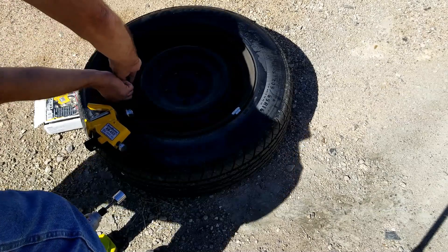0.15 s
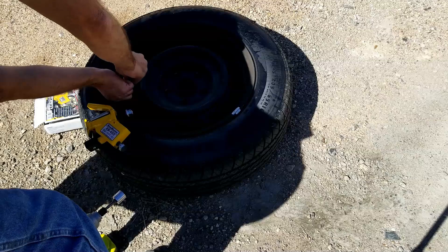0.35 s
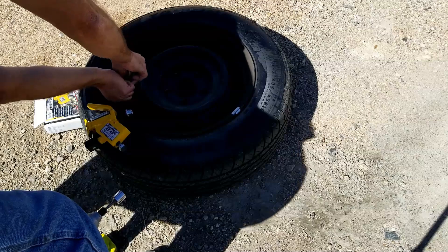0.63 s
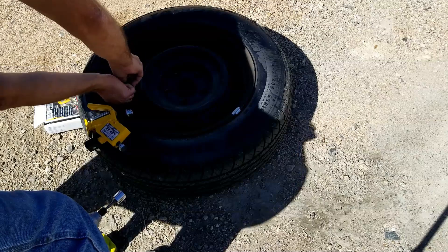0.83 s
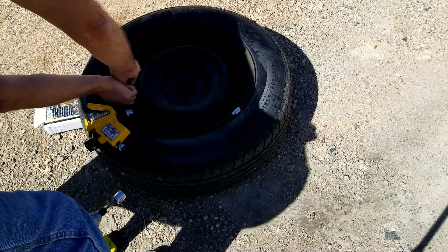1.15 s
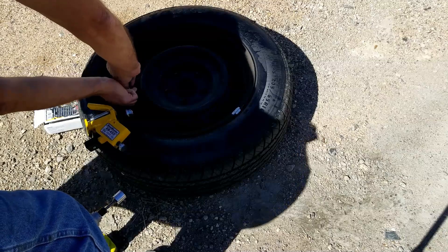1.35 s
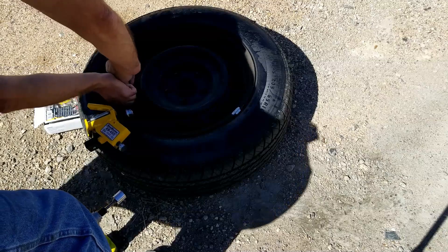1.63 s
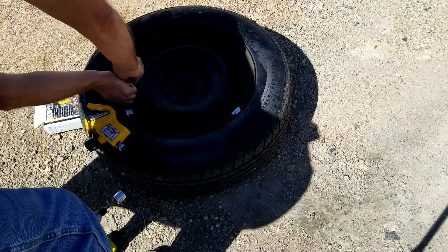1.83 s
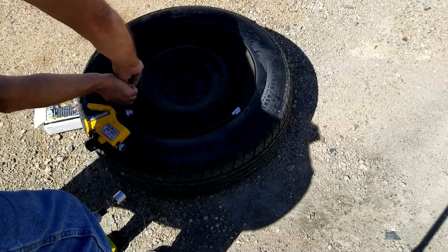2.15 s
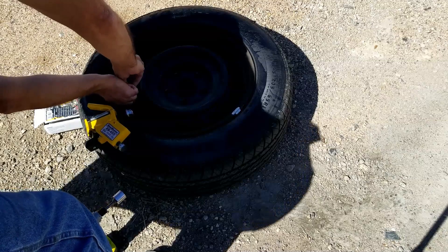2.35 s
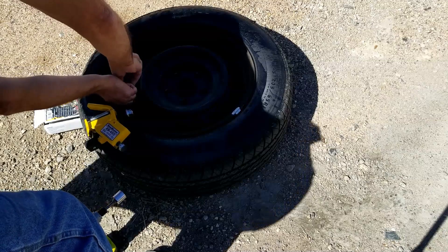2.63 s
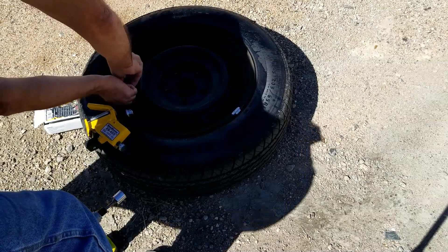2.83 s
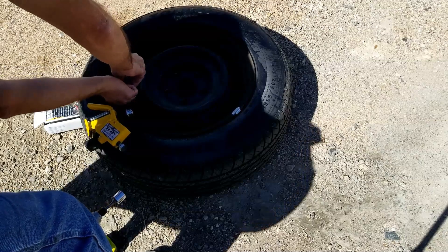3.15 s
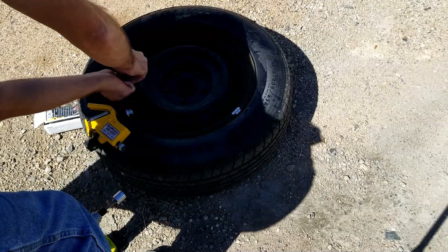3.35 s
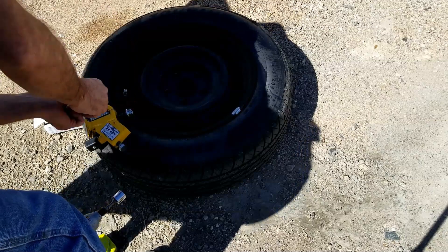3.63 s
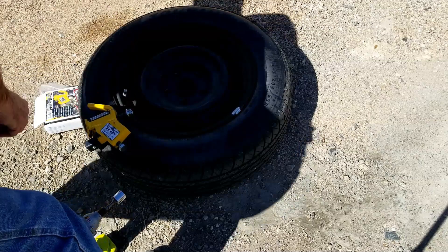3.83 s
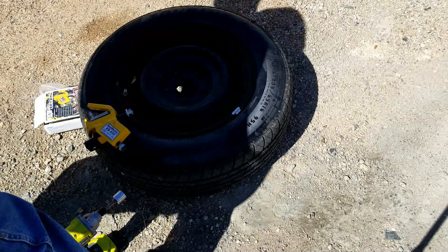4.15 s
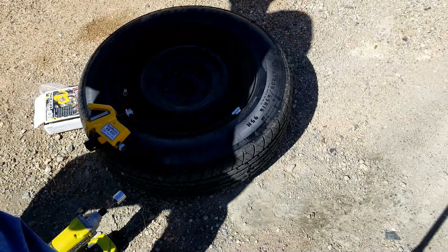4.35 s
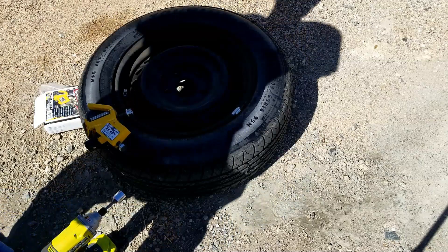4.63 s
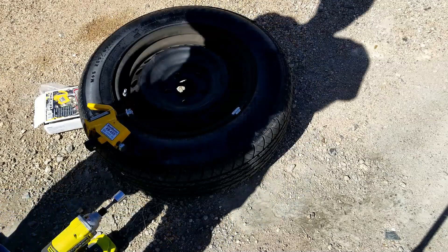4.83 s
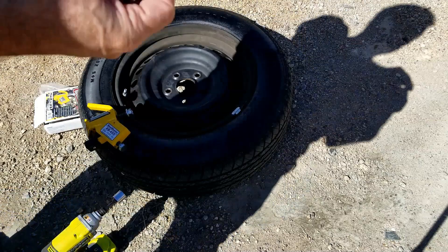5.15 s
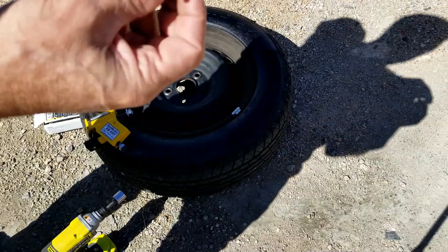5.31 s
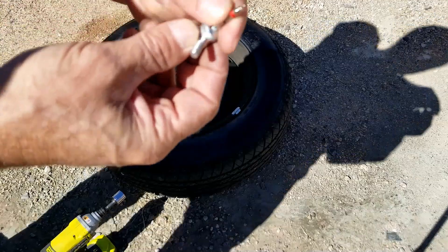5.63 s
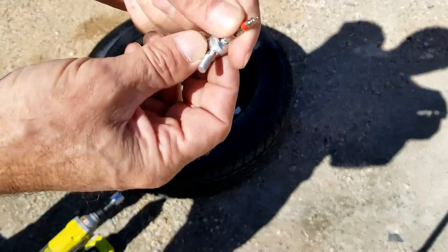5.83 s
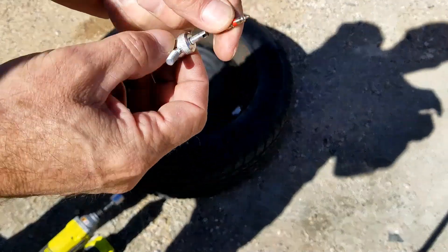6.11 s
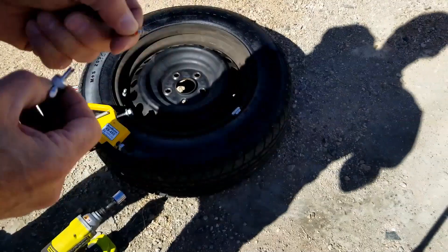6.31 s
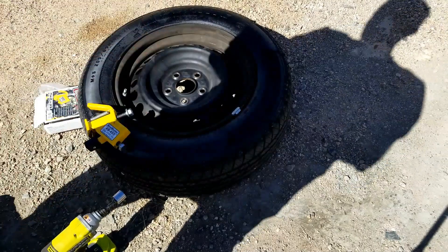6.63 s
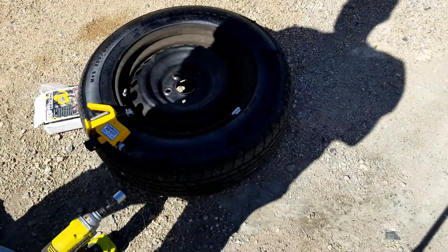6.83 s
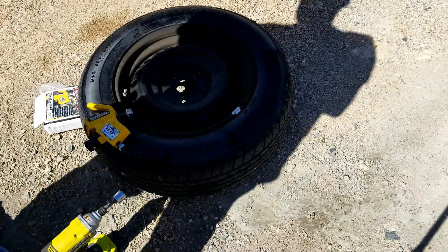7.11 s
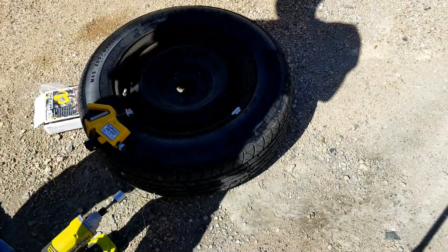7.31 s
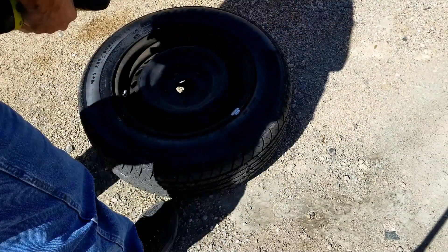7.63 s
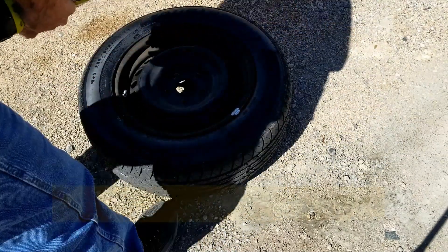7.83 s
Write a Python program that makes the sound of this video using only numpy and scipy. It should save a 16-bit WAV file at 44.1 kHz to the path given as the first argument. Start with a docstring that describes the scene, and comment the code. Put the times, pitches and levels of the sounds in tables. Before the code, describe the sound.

Pressurised air sprays unevenly from a tyre valve, squeaks, thins to a steady hiss, ends in a breathy whistle and gravel crunches, over gusty wind rumble.

```python
"""Outdoors on gravel, fingers unscrew the core of a car tyre's valve: air sprays past it, sizzling and sputtering.
The loose core squeals, spits and chirps as it comes out, then air streams from the bare stem and a hand passes.
Near the end the stem whistles, the jet is shut off and a faint leak stays. Air sounds are coloured noise; tones are sines.
A low rumble with gusts of wind runs throughout; from the middle on come dull knocks and shoes on the gravel,
made from tiny clicks."""
import sys
import numpy as np
from scipy import signal
from scipy.fft import rfft, irfft
from scipy.io import wavfile
from scipy.ndimage import uniform_filter1d

SR = 44100
rng = np.random.default_rng(int(sys.argv[2]) if len(sys.argv) > 2 else 0)


def file_out(sig):
    """Save sig as 16-bit WAV at sys.argv[1]."""
    # one column per channel
    cols = np.atleast_2d(sig).T
    # limit, then scale
    lim = np.clip(cols, -1, 1)
    pcm = np.round(lim * 32767).astype(np.int16)
    wavfile.write(sys.argv[1], SR, pcm)


N = 351477
FRAME = 512  # samples in one frame of the noise shaping
TIME = np.arange(N) / SR
BIN_HZ, FRAME_S, _ = signal.stft(np.zeros(N), SR, nperseg=FRAME)

CORE_OUT_S, CORE_FADE_S = 3.37, 0.16  # the core leaves; the two jets cross-fade this long
SHUT_S, SHUT_TAIL_S = 7.502, 0.017  # the stem is shut; the hiss falls to 37 % in this time
CHOKE_FADE_S = 0.036

# a hand near the microphone favours one treble band, shades another and reflects the rest:
# [t/s, favoured f/Hz, emphasis/dB, shade/dB, palm echo share 0-1]
HAND = [(5.12, 12100, -2, 4, 0.4), (5.27, 12000, 11, 3, 0.35), (5.45, 12100, 18, 3, 0.5),
        (5.64, 12100, 12, 11, 0.5), (5.72, 13400, 14, 14, 0.45), (6.08, 13800, 16, 18, 0.3),
        (6.25, 14000, 0, 11, 0)]
# a fingertip chokes the air: [start t/s, end t/s, level change/dB]
CHOKES = [(1.0, 1.108, -13.5), (1.199, 1.257, -13)]


def throttled_jet():
    """Air sprays past the core, rings the stem and the cupped hands, and sputters as the core turns."""
    # air let past the core: loosened, choked and reopened, then at its widest: [t/s, level/dB]
    flow_table = [
        [(0.0, -27), (0.1, -30), (0.135, -26.5), (0.224, -29), (0.262, -30), (0.285, -26), (0.45, -28),
         (0.55, -27), (0.67, -27.5), (0.745, -29), (0.766, -33), (0.79, -27.5), (0.93, -30.5), (0.95, -34)],
        [(1.1, -34), (1.125, -31.5), (1.165, -35.5), (1.32, -35.5), (1.355, -27.5), (1.5, -30.5), (1.55, -28.5),
         (1.61, -29.5), (1.645, -27), (1.68, -31), (1.77, -25)],
        [(1.855, -22), (1.88, -29), (1.91, -22.5), (1.99, -22), (2.38, -18), (2.52, -22), (2.88, -23),
         (2.99, -22), (3.11, -27), (3.15, -24), (3.5, -26.5)],
    ]
    # colour of the broad spray: [f/Hz, level per Hz/dB]
    spray_colour = [(300, -13), (900, -9.5), (1400, -1.5), (2600, -2.5), (3800, -6), (4500, -4),
                    (5600, -2.5), (9000, -1.5), (9800, 2), (10700, 1.5), (11800, 4), (13000, -2.5),
                    (16000, -7)]
    # colour of the sizzle from the slit round the core: [f/Hz, level per Hz/dB]
    sizzle_colour = [(10800, -40), (11900, -13), (12700, -7), (13500, -2), (14300, -1), (15100, -1),
                     (15700, 1)]
    # spells in which that slit sizzles: [start t/s, end t/s, level/dB]
    sizzle_spells = [(0.018, 0.726, -15), (0.265, 0.33, -13), (0.36, 0.443, -14), (0.476, 0.59, -14),
                     (1.55, 1.68, -24), (1.735, 1.88, -11), (2.293, 2.676, -9.5), (2.66, 2.912, -12)]
    spray_db, hollow_db, stem_db, sizzle_db = 1, -11, -3.5, 5  # relative to the flow
    cupped_db = 2  # the hands close round the valve and their hollow rings louder
    ringing_choked = 0.8  # share of a choke, in dB, that reaches the two resonances

    chokes_db = sum(db * gate(start, end, CHOKE_FADE_S) for start, end, db in CHOKES)
    flow_db = curves(np.vstack(flow_table))[0]
    flow = undb(flow_db + chokes_db)
    ringing = undb(flow_db + ringing_choked * chokes_db)

    fingers = reflections([0.62, 1.13], share=0.11, drift=0.097)
    spray = undb(spray_db) * turbulence(colour(spray_colour) * fingers)

    cupped = gate(1.92, 2.6, 0.06)
    hollow_hz = 1800 * (1 + wander(0.012, rate=6.86))
    hollow = turbulence(resonance(hollow_hz, 220), patchy_db=0.7)
    hollow = hollow * undb(hollow_db + cupped_db * cupped)

    stem_modes = resonance(8150, 1100) + 0.45 * resonance(6770, 1100)
    stem = undb(stem_db + 0.5 * walk(16)) * turbulence(stem_modes * fingers)

    spells = sum(undb(db) * gate(start, end, 0.056) ** 2 for start, end, db in sizzle_spells)
    sizzle_level = np.hypot(undb(sizzle_db) * flow, spells)
    sizzle = sizzle_level * turbulence(colour(sizzle_colour) * fingers)

    sputter = undb(0.6 * walk(40) + 0.5 * walk(200))
    before_core_leaves = np.sqrt(gate(-1, CORE_OUT_S, CORE_FADE_S))
    return (flow * spray + ringing * (hollow + stem) + sizzle) * sputter * before_core_leaves


def open_jet():
    """A steadier stream from the bare stem: one strong pipe resonance, and the wheel dish answering below."""
    # air from the open stem: [t/s, jet level/dB, stem resonance level/dB]
    stream_table = [(3.5, -40.5, -31), (3.86, -40, -29), (4.03, -45, -28), (4.28, -43.5, -29.5),
                    (4.42, -48, -33.5), (4.44, -44, -29.5), (5.12, -46, -33), (5.17, -48.5, -36.5),
                    (5.24, -44, -34.5), (5.64, -44, -35.5), (5.77, -44.5, -42), (6.15, -44.5, -44),
                    (6.25, -44, -35), (6.4, -43, -26.5), (6.91, -43.5, -26), (7.4, -41, -26),
                    (7.48, -42, -29)]
    # colours of the spray, the wheel dish and the sizzle: [f/Hz, level per Hz/dB]
    spray_colour = [(500, -13), (1100, -15.5), (3000, -6), (4000, -9), (4900, -2.5), (5600, -3.5),
                    (6700, -0.5), (9500, 5), (11000, 2), (12000, -1), (16000, -5)]
    dish_colour = [(600, -5.5), (1100, -11), (1500, 2.5), (1850, 2.5), (2250, 0), (2700, 3.5), (3200, -9.5),
                   (3900, -12), (5000, -12)]
    sizzle_colour = [(10500, -48), (11400, 0), (12000, 3.5), (12800, 3.5), (13900, 5.5), (15200, 7.5),
                     (15700, 8)]
    spray_db, dish_db, sizzle_db = 12.5, 4, 21.5  # relative to the jet level
    # until they move off, the fingers break up the jet: more spray, less sizzle
    fingers_spray_db, fingers_sizzle_db = 2, -1
    hand_sizzle_db = -2.5  # the passing hand screens the sizzle
    pipe_width_hz, shoulder_db = 560, -9.5  # a weaker resonance sits just above the stem's own

    jet_db, stem_db = curves(stream_table)
    stem_hz = 7844 * (1 + wander(0.0027, rate=6.7))
    fingers = gate(-1, 3.92, 0.055)
    hand_hz, emphasis_db, shade_db, palm_share = hand_at(FRAME_S)
    # the uneven palm mirrors mainly a middle band of the hiss
    palm = echo(0.46, palm_share * resonance(5550, 1300))
    shadow = palm * undb(-shade_db * resonance(8950, 3300))

    spray = turbulence(colour(spray_colour) * shadow)
    spray = spray * undb(spray_db + fingers_spray_db * fingers)
    dish = undb(dish_db) * turbulence(colour(dish_colour))
    pipe = resonance(stem_hz, pipe_width_hz) + undb(shoulder_db) * resonance(8460, pipe_width_hz)
    stem = undb(stem_db) * turbulence(pipe * palm, patchy_db=1.5)

    favoured = undb(emphasis_db * resonance(hand_hz, 1500))
    sizzle = turbulence(colour(sizzle_colour) * shadow * favoured, patchy_db=2.5)
    sizzle = sizzle * undb(sizzle_db + fingers_sizzle_db * fingers + hand_sizzle_db * hand_near())

    flutter = undb(0.22 * walk(16) + 0.44 * walk(200))
    after_core_leaves = np.sqrt(gate(CORE_OUT_S, np.inf, CORE_FADE_S))
    return (undb(jet_db) * (spray + dish + sizzle) + stem) * flutter * after_core_leaves


def spits():
    """The jet tears past the loose core in rough bursts that swell and then break off."""
    # [start t/s, end t/s, start f/Hz, end f/Hz, width/Hz, final level/dB]
    bursts = [(2.715, 2.738, 1780, 1740, 220, -32), (2.948, 2.998, 2400, 3300, 2400, -26.5),
              (3.2, 3.37, 1900, 1300, 1000, -31), (3.27, 3.41, 1050, 800, 550, -38)]
    rise_db = 3.5
    out = 0
    for start, end, *band, db in bursts:
        swell_db = np.interp(TIME, [start, end], [db - rise_db, db])
        out = out + undb(swell_db) * gate(start, end, 0.03) * airy_glide(start, end, *band)
    return out * undb(2 * walk(260))  # fast, rough changes of level


def edge_tones():
    """The jet grazes a fingertip or the stem's lip and narrows into an airy pitch."""
    # [start t/s, end t/s, start f/Hz, end f/Hz, width/Hz, level/dB]
    tone_table = [(0.119, 0.383, 7250, 7130, 1740, -24), (0.371, 0.688, 6400, 6510, 350, -28.5),
                  (0.358, 0.688, 5530, 5600, 350, -33), (0.683, 0.758, 7860, 8250, 2600, -25),
                  (1.473, 1.745, 5420, 5440, 250, -36.5), (1.677, 1.736, 7400, 7100, 1500, -25),
                  (1.743, 1.872, 8100, 8100, 500, -28), (1.95, 2.391, 6480, 6660, 800, -26.5),
                  (2.0, 2.74, 4300, 4360, 220, -38), (2.95, 3.002, 8000, 8400, 900, -19.5),
                  (2.955, 3.0, 5000, 5400, 1500, -29), (2.945, 3.0, 11500, 12600, 2600, -21.5),
                  (3.122, 3.434, 12800, 8600, 1400, -31), (3.25, 3.498, 8000, 7860, 550, -38),
                  (5.658, 6.203, 7180, 7270, 400, -41.5), (6.404, 7.103, 5900, 5800, 400, -41),
                  (7.099, 7.51, 8460, 8600, 600, -30)]
    out = 0
    for start, end, *band, db in tone_table:
        fade = gate(start, end, (end - start) / 4)
        out = out + undb(db) * fade * airy_glide(start, end, *band)
    return out


def squeal():
    """The loose core squeals: a shaky sine tone and its octave."""
    # [t/s, pitch f/Hz, level/dB]
    pitch_table = [(2.725, 1640, -34), (2.75, 1595, -25), (2.818, 1492, -20), (2.845, 1510, -22.5),
                   (2.858, 1670, -21), (2.872, 1730, -21), (2.905, 1490, -32)]
    return whistle(pitch_table, jitter=0.009, waver=0.004, flutter_db=1.2, octave_db=-21, octave_rise_db=5)


def chirp():
    """The core chirps upward as it comes out, and the octave takes over."""
    # [t/s, pitch f/Hz, level/dB]
    pitch_table = [(2.996, 5330, -28), (3.024, 5600, -18.5), (3.048, 6080, -27), (3.066, 6490, -27),
                   (3.083, 6900, -27)]
    return whistle(pitch_table, jitter=0.014, waver=0.002, flutter_db=2.2, octave_db=-7, octave_rise_db=19)


def stem_whistle():
    """The bare stem's whistle is breathy and throbs as it catches, then settles and gains its octave."""
    # [t/s, pitch f/Hz, level/dB]
    pitch_table = [(7.04, 5850, -39), (7.125, 5850, -25.5), (7.19, 5858, -24), (7.24, 5865, -21),
                   (7.405, 5895, -16.5), (7.455, 5900, -18), (7.486, 5920, -14), (7.506, 5930, -15)]
    throb_db, throb_hz, settle_s = 4.5, 40, 0.3
    (start, start_hz, _), (end, end_hz, _) = pitch_table[0], pitch_table[-1]
    unsettled = np.exp(-np.maximum(TIME - start, 0) / settle_s)
    throb = np.sin(2 * np.pi * np.cumsum(throb_hz * (1 + 0.3 * walk(20))) / SR)
    tone = whistle(pitch_table, jitter=0.0035, waver=0.001, flutter_db=0.8, octave_db=-21, octave_rise_db=6)
    airy = airy_glide(start, end, start_hz, end_hz, width_hz=220)
    airy = airy * undb(curves(pitch_table)[1]) * gate(start, end, 0.004)
    airy_share = 0.7 * unsettled ** 3  # share of the power
    mix = np.sqrt(1 - airy_share) * tone + np.sqrt(airy_share) * airy
    return undb(throb_db * unsettled * throb + 0.8 * walk(45)) * mix


def whistle(table, jitter, waver, flutter_db, octave_db, octave_rise_db=0):
    """Vortices lock into a tone and a rising octave; turbulence shakes the pitch and level."""
    hz, db = curves(table)
    start, end = table[0][0], table[-1][0]
    shaken_hz = hz * (1 + jitter * walk(900) + waver * walk(60))
    phase = 2 * np.pi * np.cumsum(shaken_hz) / SR
    rise = np.interp(TIME, [start, end], [0, 1]) ** 2
    octave = undb(octave_db + octave_rise_db * rise)
    tone = undb(db) * (np.sin(phase) + octave * np.sin(2 * phase))
    return np.sqrt(2) * tone * undb(flutter_db * walk(150)) * gate(start, end, 0.0003)


def leak(flowing):
    """Once the jet is shut, and more softly while it is choked, a little air still hisses out."""
    # [f/Hz, level per Hz/dB]
    leak_colour = [(900, -15), (2000, 0), (3200, -11), (4500, -17), (6000, -19), (7100, 1), (7800, 3),
                   (8900, -3.5), (10000, -5), (10800, -19), (12000, 1.5), (12750, -11), (14100, -2),
                   (15700, -2)]
    leak_db, choked_db = -33.5, -6.5  # level when shut, and its change when only choked
    choked = sum(gate(start, end, CHOKE_FADE_S) for start, end, _ in CHOKES)
    return undb(leak_db) * turbulence(colour(leak_colour)) * (1 - flowing + undb(choked_db) * choked)


def mirrored(x):
    """The rim, the tyre and the ground send early echoes; the sum is scaled back to about equal power."""
    # [lag/ms, level/dB]
    mirrors = [(2.3, -19), (4.6, -17), (7.7, -15)]
    echoes = sum(undb(db) * np.interp(TIME - lag_ms / 1000, TIME, x, left=0) for lag_ms, db in mirrors)
    return (x + echoes) / np.sqrt(1 + sum(undb(db) ** 2 for _, db in mirrors))


def knocks():
    """Dull knocks: single clicks ringing in a low band."""
    # [t/s, peak level/dB, ring f/Hz]
    knock_table = [(4.617, -31, 700), (4.738, -34, 950), (4.914, -27.5, 950), (4.992, -28, 1400),
                   (5.004, -23.5, 1350), (6.347, -22, 1300), (6.388, -32, 1100), (6.6, -33, 1150),
                   (6.732, -32, 850), (6.762, -30, 750), (7.472, -17.5, 1200)]
    return taps(knock_table, decay_s=0.005, scrape=0.06, spread=0.3)


def grit():
    """Grit cracks under a shoe: brighter clicks with more scrape."""
    # [t/s, peak level/dB, ring f/Hz]
    crack_table = [(7.539, -30, 3700), (7.577, -31, 4600), (7.8035, -17.5, 3000), (7.806, -20, 2700),
                   (7.8085, -26, 2800), (7.840, -28, 2600), (7.850, -24, 4800)]
    return taps(crack_table, decay_s=0.002, scrape=0.4, spread=0.45)


def taps(table, decay_s, scrape, spread):
    """One sharp contact and a brief scrape after it, both in a broad resonance."""
    out, t = np.zeros(N), TIME[:SR // 16]
    for s, db, hz in table:
        edges_hz = [hz / (1 + spread), min(hz * (1 + spread), SR / 3)]
        band = signal.butter(2, edges_hz, "band", fs=SR, output="sos")
        contact = (t == 0) + scrape * rng.standard_normal(len(t)) * np.exp(-t / decay_s)
        tap = signal.sosfilt(band, contact)
        i = int(s * SR)
        out[i:i + len(t)] += (undb(db) * tap / np.abs(tap).max())[:N - i]
    return out


def scuffs():
    """Shoes shift on the gravel: each scuff is a swell of tiny cracks of uneven size."""
    # [start t/s, end t/s, centre f/Hz, level/dB]
    scuff_table = [(4.52, 4.76, 950, -47), (4.85, 4.93, 1000, -47), (6.59, 6.62, 1200, -43),
                   (6.7, 6.8, 900, -45), (7.52, 7.61, 1300, -42), (7.555, 7.615, 4200, -41.5),
                   (7.815, 7.87, 3300, -43.5)]
    cracks_per_s, crack_spread_db, band_spread = 1400, 7, 0.35
    out = 0
    for start, end, hz, db in scuff_table:
        happens = rng.random(N) < cracks_per_s / SR
        size = undb(crack_spread_db * rng.uniform(-0.76, 1, N))
        cracks = happens * rng.choice([-1, 1], N) * size
        edges_hz = [hz / (1 + band_spread), hz * (1 + band_spread)]
        band = signal.butter(2, edges_hz, "band", fs=SR, output="sos")
        crunch = signal.sosfilt(band, cracks)
        out = out + undb(db) * gate(start, end, (end - start) / 2) * crunch / crunch.std()
    return out


def rumble():
    """A low rumble sinks and swells, with strong gusts of wind and a wavering hum in it."""
    # the rumble sinks and swells: [t/s, low rumble level/dB, upper rumble level/dB]
    rumble_table = [(0, -25.5, -36.5), (1.0, -27, -39), (1.65, -29, -39.5), (1.71, -38, -38.5),
                    (2.5, -39, -41.5), (3.3, -33, -41.5), (3.65, -39.5, -44), (4.25, -34.5, -44),
                    (4.38, -51, -48.5), (4.6, -37, -41), (5.15, -43, -43.5), (5.4, -34.5, -40.5),
                    (6.95, -36.5, -39.5), (7.47, -31, -39), (7.52, -31, -31.5), (7.97, -22, -34)]
    # the strongest gusts: [t/s, boom level/dB, body level/dB]
    gust_table = [(0.09, -19, -33), (0.23, -21.5, -32), (0.63, -24, -29), (0.95, -22, -29),
                  (1.621, -22, -34), (1.92, -33, -28), (2.23, -26, -38), (2.77, -36, -29), (3.15, -28, -31),
                  (3.56, -26, -26), (4.22, -37, -28), (4.65, -28, -25.5), (5.06, -27.5, -25.5),
                  (5.44, -32, -27), (5.71, -25.5, -29), (5.9, -31, -32), (6.15, -24, -29.5),
                  (6.46, -22.5, -27.5), (6.73, -28, -25.5), (7.05, -19.5, -27), (7.33, -26, -26.5),
                  (7.58, -18.5, -21), (7.75, -16.5, -26), (7.93, -28, -23)]
    # colours of the rumble, from its lowest part up: [f/Hz, level per Hz/dB]
    boom_colour = [(20, -15), (35, -18), (50, -7.5), (62, -1.5), (76, 2), (92, -26), (130, -56.5)]
    body_colour = [(65, -14.5), (84, 1.5), (99, 1), (113, -6), (127, -2.5), (140, -6), (154, -10.5),
                   (178, -19.5), (193, -10), (215, -15.5), (260, -33), (400, -66)]
    upper_colour = [(170, -2), (235, 0), (285, 1), (325, -2.5), (380, -1.5), (500, -5.5), (670, -12),
                    (900, -18), (1500, -25.5), (4000, -72)]
    gust_s = 0.042  # a gust falls to 37 % this long before and after its peak
    boom_db, body_db, body_follows = 1, -13.5, 0.52  # between gusts the body grows more slowly than the boom
    upper_follows = 0.39  # share of the buffeting that reaches the upper rumble

    low_db, upper_db = curves(rumble_table)
    buffet_db = 1.57 * walk(14)
    low_level = undb(low_db + buffet_db)
    boom_gusts, body_gusts = sum(
        undb(dbs)[:, None] * np.exp(-((TIME - s) / gust_s) ** 2) for s, *dbs in gust_table)

    hum_share = 0.78 * np.exp(-TIME / 2)  # share of the boom's power, fading away
    hum = np.sqrt(2) * np.sin(2 * np.pi * np.cumsum(62.2 * (1 + 0.022 * walk(13))) / SR)
    boom = np.sqrt(hum_share) * hum + np.sqrt(1 - hum_share) * low_noise(boom_colour, evenness=0.95)
    boom = boom * np.hypot(undb(boom_db) * low_level, boom_gusts)

    body = low_noise(body_colour, evenness=0.8)
    body = body * np.hypot(undb(body_db) * low_level ** body_follows, body_gusts)
    upper = low_noise(upper_colour, evenness=1)
    upper = upper * undb(upper_db + upper_follows * buffet_db + 1.3 * walk(40))
    return (boom + body) * undb(1.4 * walk(40)) + upper


def low_noise(points, evenness):
    """Low noise of unit level; evenness 0-1 steadies its slow swells."""
    spectrum = rfft(rng.standard_normal(N)) * colour(points, np.fft.rfftfreq(N, 1 / SR))
    noise = irfft(spectrum, N)
    power = uniform_filter1d(noise ** 2, size=SR // 12)
    noise = noise / power ** (evenness / 2)
    return noise / noise.std()


def turbulence(gain, patchy_db=3.0):
    """Noise of unit level whose colour follows a gain over frequency and time; its bands flicker at random."""
    white = signal.stft(rng.standard_normal(N), nperseg=FRAME)[2]
    flicker = uniform_filter1d(rng.standard_normal(white.shape), size=3, axis=0)
    flicker = uniform_filter1d(flicker, size=14, axis=1)
    gain = gain * undb(patchy_db * flicker / flicker.std())
    # each frame is levelled, so the gain shapes only the colour
    even_gain = gain / np.sqrt(np.mean(gain ** 2, axis=0))
    return signal.istft(white * even_gain, nperseg=FRAME)[1][:N]


def airy_glide(start, end, start_hz, end_hz, width_hz):
    """A band of noise of unit level whose centre glides between two moments."""
    phase = 2 * np.pi * np.cumsum(np.interp(TIME, [start, end], [start_hz, end_hz])) / SR
    low_pass = signal.butter(2, width_hz / 2, fs=SR, output="sos")
    airy = signal.sosfilt(low_pass, rng.standard_normal((2, N)))
    return (airy[0] * np.cos(phase) + airy[1] * np.sin(phase)) / airy.std()


def hand_near():
    """One while the hand is in front of the microphone, else zero."""
    return gate(HAND[0][0], HAND[-1][0], 0.1)


def hand_at(frames_s):
    """The hand's columns over time; it colours the jet only while it is in front of the microphone."""
    hz, *effects = curves(HAND, frames_s)
    near = np.interp(frames_s, TIME, hand_near())
    return [hz] + [near * effect for effect in effects]


def reflections(lags_ms, share, drift):
    """Several near reflections whose paths drift as the hands move."""
    return np.prod([echo(lag * (1 + wander(drift, rate=4)), share) for lag in lags_ms], axis=0)


def echo(lag_ms, share):
    """Comb colour of one reflection from a near surface: some pitches add up, others cancel."""
    turn = np.exp(-2j * np.pi * BIN_HZ[:, None] * lag_ms / 1000)
    return np.abs(1 + np.clip(share, 0, 0.8) * turn)


def resonance(centre_hz, width_hz):
    """Gain of a resonance, 3 dB down at its edges; the centre may move from frame to frame."""
    detuning = 2 * (BIN_HZ[:, None] - centre_hz) / width_hz
    return 1 / (1 + (np.sqrt(2) - 1) * detuning ** 2)


def colour(points, hz=BIN_HZ[:, None]):
    """Gain of a spectrum given by points of f/Hz and level/dB, falling away below its first point."""
    f, db = np.transpose(points)
    level_db = np.interp(np.log(hz + 1), np.log(f), db)
    return undb(level_db) * np.minimum(hz / f[0], 1) ** 2


def walk(rate):
    """Smooth chance with a spread near 1, renewed rate times a second."""
    steps = rng.standard_normal(int(N / SR * rate) + 2)
    joined = np.interp(TIME * rate, np.arange(len(steps)), steps)
    return 1.625 * uniform_filter1d(joined, int(SR / rate / 2) + 1)


def wander(depth, rate):
    """A slow random drift, one value for each noise frame."""
    return depth * np.interp(FRAME_S, TIME, walk(rate))


def gate(start, end, fade):
    """One between two moments, with straight ramps centred on them."""
    return np.clip(np.minimum(TIME - start, end - TIME) / fade + 0.5, 0, 1)


def curves(table, at=TIME):
    """The columns of a table, joined by straight lines in time."""
    s, *columns = np.transpose(table)
    return [np.interp(at, s, c) for c in columns]


def undb(db):
    """Decibels to gain."""
    return 10 ** (np.asarray(db) / 20)


def scene():
    """The jet stops when the stem is shut, leaving a faint leak; both channels carry the same sound."""
    flowing = np.exp(-np.maximum(TIME - SHUT_S, 0) / SHUT_TAIL_S)
    hiss = mirrored(throttled_jet() + open_jet() + edge_tones() + spits())
    tones = squeal() + chirp() + stem_whistle()
    air = hiss * flowing + tones + leak(flowing)
    ground = knocks() + grit() + scuffs()
    return np.tile(air + ground + rumble(), (2, 1))


def record(dry):
    """The recorder cuts the top steeply, above 15750 Hz."""
    low_pass = signal.ellip(12, 0.1, 90, 15750, fs=SR, output="sos")
    return signal.sosfilt(low_pass, dry)


dry = scene()
out = record(dry)
file_out(out)
```